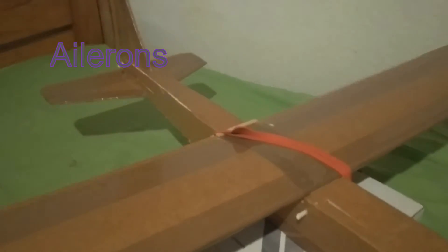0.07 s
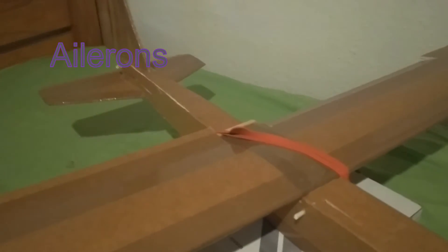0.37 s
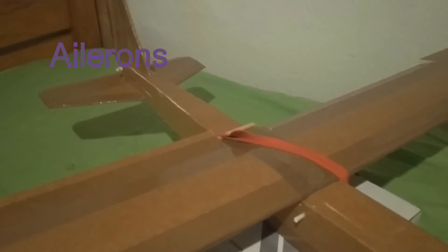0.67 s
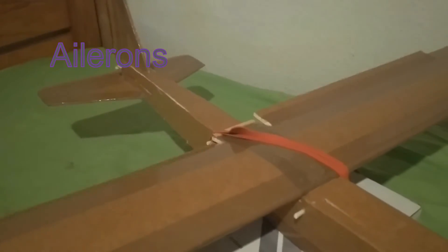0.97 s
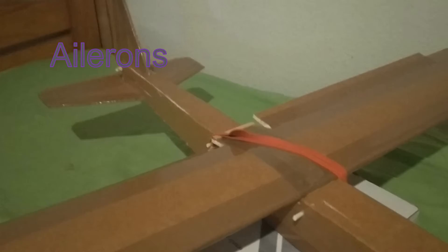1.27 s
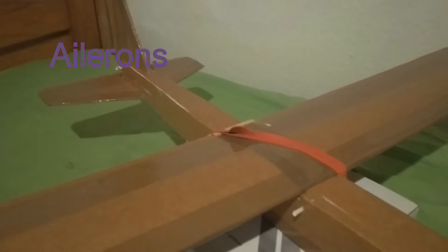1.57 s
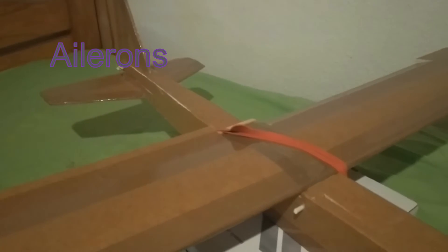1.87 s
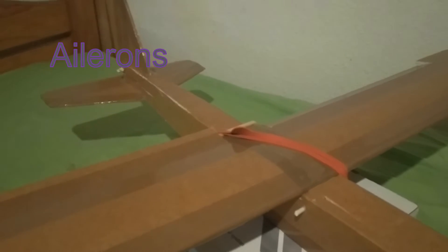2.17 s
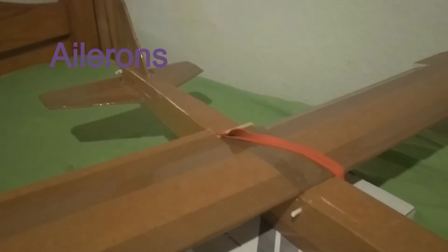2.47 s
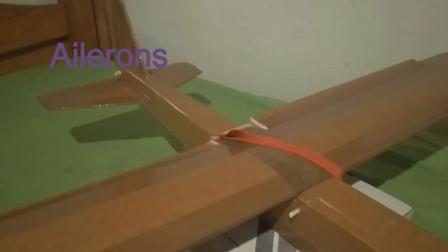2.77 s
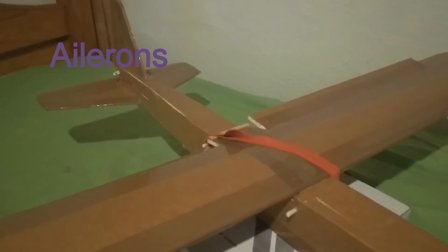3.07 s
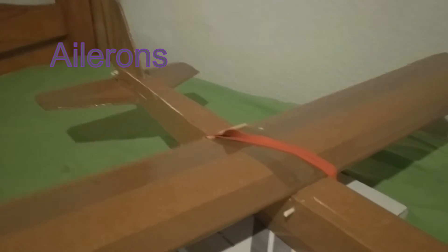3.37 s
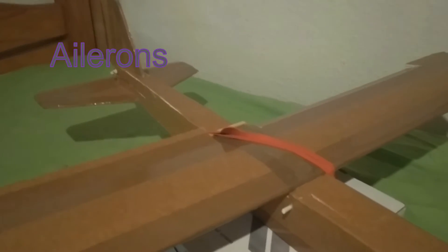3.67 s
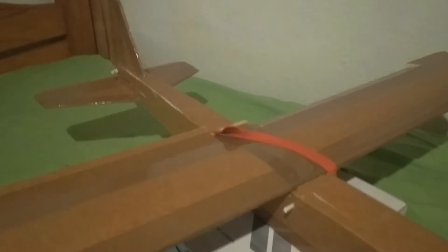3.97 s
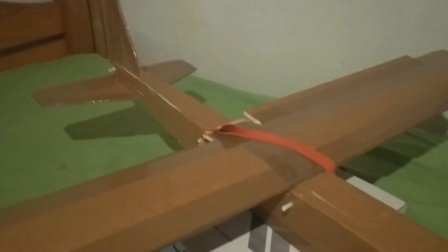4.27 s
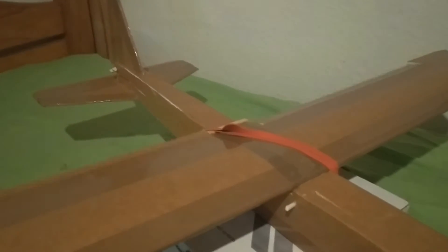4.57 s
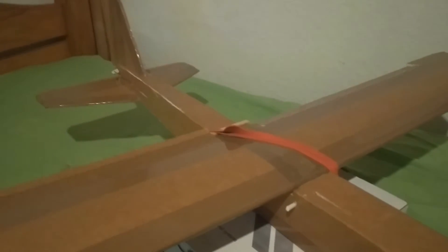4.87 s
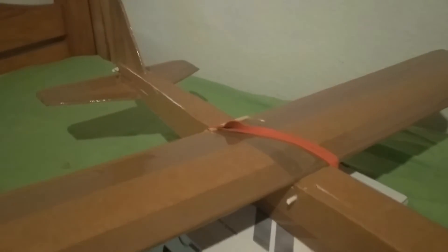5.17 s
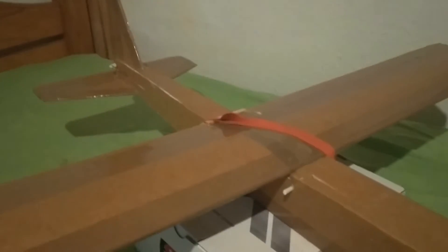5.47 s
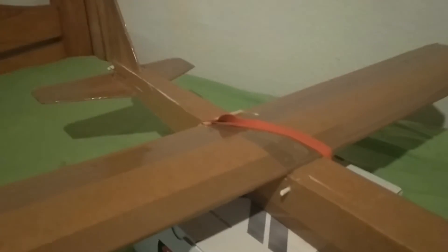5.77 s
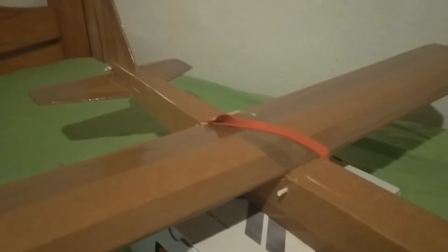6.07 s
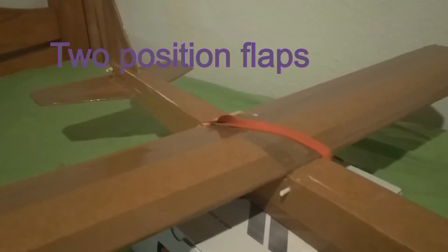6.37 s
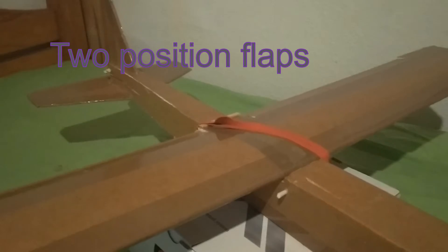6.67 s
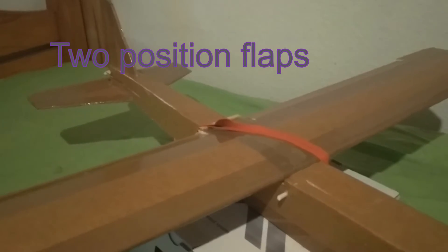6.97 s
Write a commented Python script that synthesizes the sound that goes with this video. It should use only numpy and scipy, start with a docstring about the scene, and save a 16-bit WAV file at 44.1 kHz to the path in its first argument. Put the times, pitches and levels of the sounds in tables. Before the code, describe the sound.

Small servo motors whirr and rattle in short spurts on a model plane, ticking between moves, with a few switch clicks in a quiet room.

```python
"""Small servos whirr and rattle, swinging a model plane's ailerons to and fro, then setting its flaps.
In each move the motors speed up, run and slow to a creep; gear rattle, case noise and whine follow.
Between moves the servos tick 50 times a second as they hold. Gears jolt and push rods knock on the wing.
The transmitter's stick and flap switch click close by on the left. The small room rumbles faintly."""
import sys
import numpy as np
from scipy import signal
from scipy.fft import rfft, irfft
from scipy.io import wavfile
from scipy.ndimage import uniform_filter1d

SR = 44100
rng = np.random.default_rng(int(sys.argv[2]) if len(sys.argv) > 2 else 0)


def generate_wav(signal):
    """Clip the signal to [-1, 1] and save it as 16-bit WAV at the path in sys.argv[1]."""
    frames = np.transpose(np.atleast_2d(signal))
    scaled = np.clip(frames, -1, 1) * 32767
    pcm = np.round(scaled).astype(np.int16)
    wavfile.write(sys.argv[1], SR, pcm)


N = 313992
TIME = np.arange(N) / SR
FRAME_S = .02  # control pulse period
SIDE = np.array([[1], [-1]])  # left +, right -

# servo moves: start_s, rise_s, run_s, fall_s, top_turns_per_s, roughness, rattle_db, case_db, whine_db
MOVES = [(-.06, 0.038, .018, .09, 313, 0.7, -38, -43, -62),
         (.483, 0.11, .078, 0.15, 320, 1.06, -35, -38, -41),
         (1.122, 0.033, 0.076, .11, 332, 0.63, -35.5, -36.5, -39),
         (1.44, .064, 0.047, .16, 242, 0.69, -39.5, -40, -41.5),
         (2.321, 0.11, .083, 0.17, 360, 0.84, -35.5, -38.5, -40.5),
         (2.984, 0.083, .025, 0.25, 398, .25, -33.5, -34.5, -33),
         (3.683, .13, .028, .21, 381, 0.81, -35.5, -37, -37.5),
         (4.143, 0.099, .012, .245, 402, 0.22, -32, -33.5, -30.5),
         (4.5, 0.11, 0.086, 0.11, 237, .9, -39.5, -42, -40.5),
         (6.281, .018, 0.0075, .13, 260, .8, -41, -43.5, -59),
         (6.921, .01, 0.0098, .11, 274, 0.79, -39.5, -42, -73)]
# spectrum of gear ticks and jolts: freq_hz, gain_db
TICK_SPECTRUM = [(350, -6), (900, -6), (1600, -5.5), (2500, -8.5), (4200, 5), (5400, 1), (7000, 2.5),
                 (9000, 4), (10500, -7.5), (12000, -12.5), (15800, -20.5)]


def from_db(db):
    return 10 ** (np.asarray(db) / 20)


def unit_rms(x):
    return x / np.sqrt(np.mean(x ** 2) + 1e-20)


def drift(rate_hz):
    """Slow random wander, unit RMS."""
    knots = rng.standard_normal(8000)
    return unit_rms(np.interp(TIME * rate_hz, np.arange(len(knots)), knots))


def highpass(x, hz, order=1):
    return signal.sosfilt(signal.butter(order, hz, "high", fs=SR, output="sos"), x)


def colour(x, spectrum):
    """Minimum-phase filter, 24 dB/octave skirts; white noise keeps its power."""
    size = 8192
    hz, db = np.transpose(spectrum)
    grid_hz = np.linspace(1, SR / 2, size // 2 + 1)
    outside_oct = np.maximum(np.log2(hz[0] / grid_hz), 0) + np.maximum(np.log2(grid_hz / hz[-1]), 0)
    gain = unit_rms(from_db(np.interp(np.log(grid_hz), np.log(hz), db) - 24 * outside_oct))
    cepstrum = irfft(np.log(gain + 1e-6))
    cepstrum[1:size // 2] *= 2
    cepstrum[size // 2 + 1:] = 0
    return signal.fftconvolve(x, irfft(np.exp(rfft(cepstrum))))[:N]


def ring(x, hz, t60_s):
    """One mode: a unit click starts a decaying unit sine."""
    r, w = from_db(-60 / (t60_s * SR)), 2 * np.pi * hz / SR
    return signal.lfilter([0, np.sin(w)], [1, -2 * r * np.cos(w), r * r], x + 1e-18)


def bursts(start_s, level_db, decay_s, rise_s):
    """Sprays of tiny contacts that build up and die away."""
    impulses = np.zeros(N)
    impulses[np.round(start_s * SR).astype(int)] = from_db(level_db)
    t = TIME[:SR // 10]
    shape = (1 - np.exp(-t / rise_s)) * np.exp(-t / decay_s)
    return signal.fftconvolve(impulses, shape / shape.max())[:N] * rng.standard_normal(N)


def room(x, early_db, tail_db, lag_s=0., pan_db=0., t60_s=.28):
    """Direct sound, early reflections and tail; the right side lags by lag_s, pan_db favours the left."""
    t = TIME[:SR // 2]
    out = np.array([x, np.interp(TIME - lag_s, TIME, x)]) * from_db(SIDE * pan_db / 2)
    early = np.exp(-t / .014) * (t > .001)
    tail = (1 - np.exp(-t / .008)) * from_db(-60 * t / t60_s)
    for level_db, shape in [(early_db, early), (tail_db, tail)]:
        mid, side = rng.standard_normal((2, len(t)))
        echoes = (mid + highpass(side, hz=500) * SIDE) * shape / np.sqrt(2 * np.sum(shape ** 2))
        out = out + from_db(level_db) * signal.fftconvolve(x[None], echoes, axes=1)[:, :N]
    return out


def motor_state(kick_share=.4, creep_turns_per_s=75.):
    """Speed (turns/s) and whine roughness: the motor leaps, eases to top speed, runs, slows to a creep."""
    speed, roughness = np.full(N, creep_turns_per_s), np.zeros(N)
    for start_s, rise_s, run_s, fall_s, top_speed, move_roughness, *_ in MOVES:
        begun = TIME >= start_s
        t = TIME[begun] - start_s
        up = np.clip(t / rise_s, 0, 1)
        down = np.clip((t - rise_s - run_s) / fall_s, 0, 1)
        driven = top_speed * (kick_share + (1 - kick_share) * np.sin(np.pi / 2 * up))
        speed[begun] = driven * (1 - down) + creep_turns_per_s * down
        roughness[begun] = min(move_roughness, 1)
    return speed, roughness


def move_gains(speed):
    """Rattle, case and whine gains: powers of speed, raised by starting strain and by loose teeth."""
    # the load lifts, teeth run loose: middle_s, half_length_s, extra_rattle_db
    loose_spells = [(0.511, .025, 3), (0.664, 0.053, 5.5), (1.237, .025, 4), (1.526, .025, 8),
                    (1.622, 0.017, 5), (2.493, 0.063, 4.5), (2.592, 0.017, 8), (3.111, .035, 6),
                    (3.246, 0.015, 8), (3.843, 0.038, 6), (3.93, 0.023, 11.5), (4.281, 0.049, 5),
                    (4.431, .018, 5), (6.311, .015, 6.5), (6.94, 0.017, 7)]
    speed_powers, strain_db = np.c_[[1.6, 1.97, 2.7]], [4, 4, .5]  # rattle, case, whine
    gains = np.zeros((3, N))
    for start_s, rise_s, run_s, fall_s, top_speed, _, *levels_db in MOVES:
        moving = (TIME >= start_s) & (TIME < start_s + rise_s + run_s + fall_s)
        strain = np.maximum(1 - (TIME[moving] - start_s) / rise_s, 0)
        strained_db = np.c_[levels_db] + np.outer(strain_db, strain)
        gains[:, moving] = from_db(strained_db) * (speed[moving] / top_speed) ** speed_powers
    for middle_s, half_s, extra_db in loose_spells:
        near = np.abs(TIME - middle_s) < 2 * half_s
        gains[0, near] *= from_db(extra_db * np.exp(-((TIME[near] - middle_s) / half_s) ** 2))
    return uniform_filter1d(gains, size=220, axis=1)


def motor_turns(speed, ratio, late_s, wobble):
    """Running turn count of one motor; its speed wavers under load."""
    own_speed = np.interp(TIME - late_s, TIME, speed) * ratio
    return np.cumsum(own_speed * (1 + wobble * drift(rate_hz=90))) / SR


def drive_pulses(speed, slowing):
    """Full drive until the motor nears its goal, then one short pulse a frame. Mean power 1."""
    sharpness = np.minimum(1.3 * (100 / speed) ** 2, 2) * uniform_filter1d(1. * slowing, size=900)
    frame_rad = 2 * np.pi * (TIME - .002) / FRAME_S
    return np.exp(sharpness * np.cos(frame_rad)) / np.sqrt(np.i0(2 * sharpness))


def shaft_bounce(x, feedback=.6):
    """Strikes bounce along the shafts: all-passes smear them by about 1 ms."""
    for lag_samples in (5, 11, 19):
        poles = np.r_[1, np.zeros(lag_samples - 1), -feedback]
        x = signal.lfilter(poles[::-1], poles, x)
    return x


def gear_teeth(turns, slowing, uneven_db, wear, scrape=.2, teeth=9):
    """Pinion teeth strike one by one, harder once a turn and during each drive pulse."""
    speed = np.gradient(turns) * SR
    tooth = np.floor(turns * teeth).astype(int)
    flaws = rng.standard_normal(teeth)  # recur every turn
    loose_play = rng.standard_normal(N)
    force = wear * unit_rms(flaws - flaws.mean())[tooth % teeth] + loose_play
    unevenness = from_db(uneven_db * np.clip(drift(rate_hz=700), -2, 2))
    strikes = np.diff(tooth, prepend=0) * force * unevenness
    contact = unit_rms(strikes / np.sqrt(speed)) + scrape * rng.standard_normal(N)
    once_a_turn = 1 + .5 * np.cos(2 * np.pi * turns)
    return shaft_bounce(unit_rms(contact * once_a_turn) * drive_pulses(speed, slowing))


def gear_rattle(strikes, turns):
    """Teeth ring the small gears; faster teeth sound brighter."""
    # small gears: freq_hz, gain_db
    gear_spectrum = [(3060, -11.5), (5200, -9.5), (5480, -13.5), (6430, -3), (7580, -1.5), (8760, 1.5),
                     (10500, -4.5), (11800, -15), (14000, -16), (15200, -18.5), (16000, -37)]
    rattle = from_db(-2.5) * colour(strikes, gear_spectrum)
    treble = signal.sosfiltfilt(signal.butter(2, 9500, "high", fs=SR, output="sos"), rattle)
    speed = np.gradient(turns) * SR
    return rattle + .6 * (speed / 310 - 1) * treble


def case_noise(strikes):
    """Teeth ring the gear case, lower than the gears."""
    # gear case: freq_hz, gain_db
    case_spectrum = [(65, -49), (110, -7.5), (146, -16), (318, -9), (415, -11), (717, -4.5), (833, -6.5),
                     (1020, 0), (1070, -4), (1240, -1.5), (2180, -7), (2940, -4), (3410, -8.5), (4030, 2.5),
                     (5800, -10.5), (7540, -43.5), (12800, -120)]
    return from_db(-4) * colour(strikes, case_spectrum)


def wing_ring(x):
    """The wing's ringing, as strong as its drive x; neighbouring modes alternate in sign."""
    # wing modes: freq_hz, gain_db, t60_s
    modes = [(543, -10.5, 0.18), (706, -12, 0.3), (903, -7, 0.11), (1006.4, -8.5, 0.43), (1125, -1, 0.19),
             (1670, -4, 0.15)]
    ringing = sum((-1) ** k * from_db(db) * ring(x, hz, t60_s) for k, (hz, db, t60_s) in enumerate(modes))
    return unit_rms(ringing) * np.std(x)


def motor_whine(turns, roughness, gain):
    """Three rotor poles sound at 3x the turn rate; brushes roughen the note, and it rings the wing."""
    pole_rad = 3 * 2 * np.pi * turns
    brushes = np.sqrt(1 - roughness ** 2) + roughness * drift(rate_hz=330)
    note = np.sin(pole_rad) * brushes + from_db(-24) * np.sin(2 * pole_rad)
    radiated = gain * highpass(note, hz=540, order=3)  # the wing radiates lows poorly
    return radiated + from_db(-3.5) * wing_ring(radiated)


def wing_shake(turns):
    """Near top speed the rotor's unbalance meets a wing resonance."""
    shake = ring(np.sin(2 * np.pi * turns), hz=379, t60_s=.1)
    return shake / np.abs(shake).max()


def servo(turns, gains, slowing, roughness, whine_db, lag_s, pan_db):
    """One moving servo: gear rattle, case noise and motor whine."""
    rattle_gain, case_gain, whine_gain = gains
    worn_strikes = gear_teeth(turns, slowing, uneven_db=2.5, wear=1.4)
    loose_strikes = gear_teeth(turns, slowing, uneven_db=3, wear=.35)
    rattle = gear_rattle(worn_strikes * rattle_gain, turns)
    case = case_noise(loose_strikes * case_gain)
    whine = motor_whine(turns, roughness, from_db(whine_db) * whine_gain)
    return (room(rattle, early_db=-2, tail_db=-6, lag_s=lag_s, pan_db=pan_db)
            + room(case, early_db=-1.5, tail_db=-3.5, lag_s=lag_s)
            + room(whine, early_db=-5.5, tail_db=-7.5))


def moving_servos():
    """One servo in each wing; they run together at slightly different speeds."""
    speed, roughness = motor_state()
    gains = move_gains(speed)
    slowing = np.gradient(speed) < 0
    right_turns = motor_turns(speed, ratio=1, late_s=0, wobble=.012)
    left_turns = motor_turns(speed, ratio=.9, late_s=.006, wobble=.025)
    shake = from_db(-7.5) * wing_shake(right_turns) * gains[2]  # follows the whine gain
    return (servo(right_turns, gains, slowing, roughness, whine_db=-5, lag_s=.00009, pan_db=-14)
            + servo(left_turns, gains, slowing, roughness, whine_db=-8, lag_s=.00005, pan_db=12)
            + room(shake, early_db=-19, tail_db=-36))


def room_rumble():
    """Low rumble, much alike on both sides, with a faint wide hiss."""
    # room air: freq_hz, gain_db
    air_spectrum = [(12, -27), (20, -4), (65, -2.5), (93, -13.5), (120, -10.5), (248, -20), (285, -25),
                    (472, -24.5), (513, -26), (1120, -34), (1440, -32.5), (1710, -35), (4540, -37),
                    (16000, -36)]
    mid, side = (colour(rng.standard_normal(N), air_spectrum) for _ in range(2))
    width = .37 * side + .81 * highpass(side, hz=900)
    return from_db(-60.5) * (mid + width * SIDE)


def hold_gains(settle_db=2.5):
    """Tick and hum gains: in each hold the hum is steady and the ticks soften as the servo settles."""
    # spells of holding position: start_s, end_s, tick_db, hum_db
    holds = [(0.074, 0.457, -52.5, -69), (0.818, 1.071, -51, -69.5), (1.3, 1.397, -45.5, -73),
             (1.73, 2.074, -53.5, -67), (2.235, 2.3, -56.5, -68), (2.697, 2.875, -50.5, -72),
             (3.32, 3.67, -54, -67.5), (4.01, 4.149, -48, -69), (4.81, 4.889, -49, -73),
             (6.399, 6.549, -52.5, -70.5), (7.03, 7.118, -48.5, -65.5)]
    gains = np.zeros((2, N))
    for start_s, end_s, tick_db, hum_db in holds:
        holding = (TIME >= start_s) & (TIME < end_s)
        gains[0, holding] = from_db(tick_db + np.linspace(settle_db, -settle_db, holding.sum()))
        gains[1, holding] = from_db(hum_db)
    return uniform_filter1d(gains, size=220, axis=1)


def holding_servos(tick_lag_s=.00089):
    """Each control pulse kicks the stalled motor: a tick in the gears, a faint hum in the wing."""
    tick_gain, hum_gain = hold_gains()
    pulse_s = np.arange(0, N / SR - FRAME_S / 2, FRAME_S)
    scatter_db = rng.normal(0, 2, len(pulse_s))
    sprays = bursts(pulse_s + tick_lag_s, scatter_db, decay_s=.0011, rise_s=.003)
    ticks = from_db(-2) * colour(unit_rms(sprays) * tick_gain, TICK_SPECTRUM)
    kicks = np.zeros(N)
    kicks[np.round(pulse_s * SR).astype(int)] = 1
    hum = from_db(-1) * hum_gain * unit_rms(wing_ring(kicks))
    return room(ticks, early_db=-11, tail_db=-9, lag_s=.00008) + room(hum, early_db=-15, tail_db=-10)


def gear_jolts():
    """The gears jolt as they take up slack."""
    # jolts: start_s, level_db
    jolts = [(0.103, -33), (0.4898, -18), (0.7819, -24), (0.861, -26.5), (0.9208, -34.5), (0.9597, -35),
             (0.9785, -35), (1.082, -23), (1.4209, -30), (1.88, -24), (2.779, -45), (2.818, -35),
             (2.9612, -26.5), (3.3796, -24), (3.683, -42), (4.146, -19), (6.2869, -19), (6.3038, -19),
             (6.499, -27.5), (6.9268, -21), (6.9446, -21.5), (7.0614, -25.5)]
    contacts = from_db(-12) * bursts(*np.transpose(jolts), decay_s=.0034, rise_s=.0051)
    return room(colour(contacts, TICK_SPECTRUM), early_db=-9, tail_db=-8.5, lag_s=.00008)


def rod_knocks():
    """Push rods knock dully on the hollow wing."""
    # knocks: start_s, level_db
    knocks = [(0.691, -19.5), (0.861, -34), (1.478, -28), (2.515, -23), (2.616, -20)]
    # struck wing: freq_hz, gain_db
    wing_spectrum = [(100, -2), (300, -0.5), (750, -5), (1050, 3), (1600, -29), (5000, -47)]
    contacts = from_db(-22) * bursts(*np.transpose(knocks), decay_s=.0057, rise_s=.0012)
    return room(colour(contacts, wing_spectrum), early_db=-7, tail_db=-6)


def transmitter_clicks():
    """A sprung contact slides, snaps over, and the plastic housing answers just after."""
    # stick and switch clicks: time_s, snap_db, housing_db, pan_db
    clicks = [(4.8043, -31, -66, 20), (4.8938, -29, -60, 15), (4.996, -25.5, -58.5, 10),
              (5.0684, -31.5, -68, 4), (6.2314, -12, -47, 21.5), (6.8609, -19, -36, 29.5)]
    # sprung contact: freq_hz, gain_db
    contact_spectrum = [(1500, -21), (2200, -11), (4000, -13), (5400, -2.5), (7000, -4), (9300, 12.5),
                        (11500, 5.5), (15500, -7.5)]
    # plastic housing: freq_hz, gain_db
    housing_spectrum = [(150, -13.5), (250, 3.5), (450, -15), (720, -0.5), (950, 0), (1500, -3),
                        (2400, -4.5), (3500, -8.5), (5400, -10.5), (9000, -4)]
    time_s, snap_db, housing_db, pan_db = np.transpose(clicks)
    slide = from_db(-20) * bursts(time_s - .0015, snap_db, decay_s=.0023, rise_s=.002)
    snap = bursts(time_s + .00093, snap_db, decay_s=.0025, rise_s=.00021)
    contact = from_db(-12) * colour(slide + snap, contact_spectrum)
    answer = bursts(time_s + .00199, housing_db, decay_s=.003, rise_s=.002)
    housing = from_db(9) * colour(answer, housing_spectrum)
    return (room(contact, early_db=-3, tail_db=-.5, pan_db=np.interp(TIME, time_s, pan_db))
            + room(housing, early_db=-5.5, tail_db=-8, lag_s=.00041, pan_db=3.5))


def scene():
    servos = moving_servos() + holding_servos()
    return servos + gear_jolts() + rod_knocks() + transmitter_clicks() + room_rumble()


def record(dry):
    """The left microphone is brighter above 11 kHz; a steep cut at 16 kHz ends the treble."""
    treble = signal.sosfiltfilt(signal.butter(3, 11000, "high", fs=SR, output="sos"), dry)
    tilted = dry + .2 * treble * SIDE
    return signal.sosfilt(signal.ellip(10, .2, 80, 16000, fs=SR, output="sos"), tilted)


dry = scene()
out = record(dry)
generate_wav(out)
```